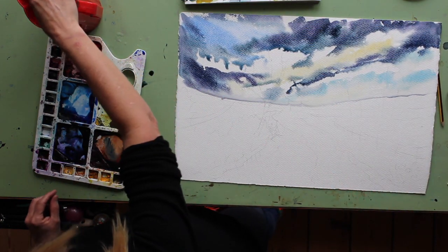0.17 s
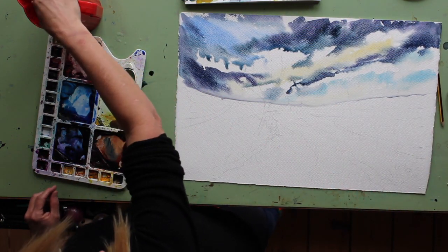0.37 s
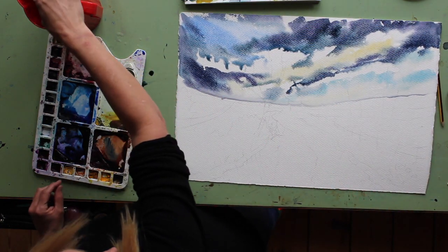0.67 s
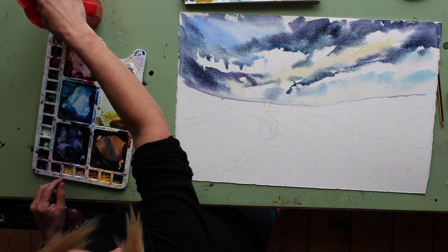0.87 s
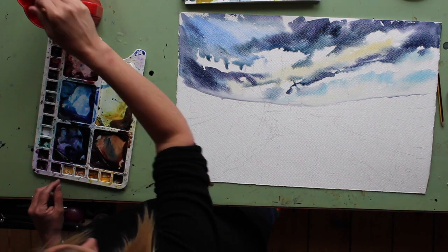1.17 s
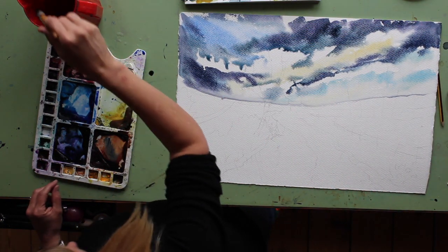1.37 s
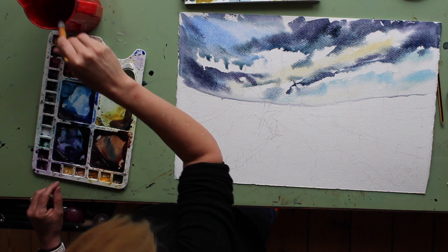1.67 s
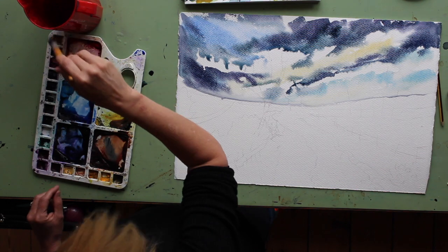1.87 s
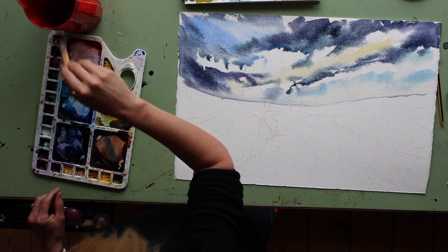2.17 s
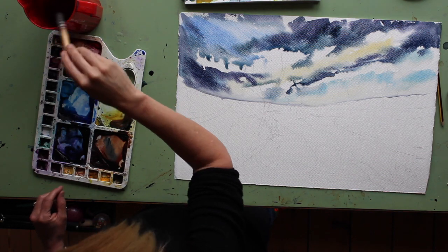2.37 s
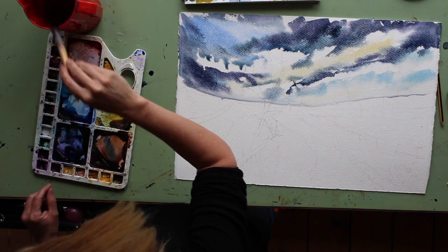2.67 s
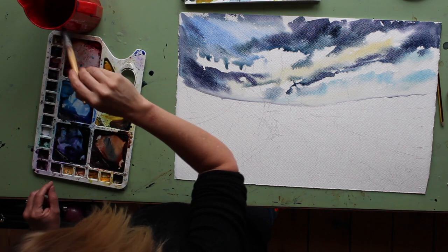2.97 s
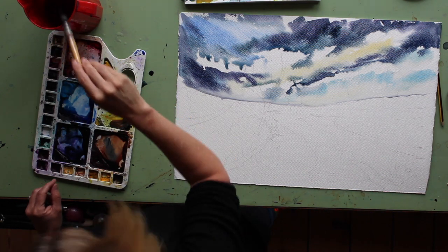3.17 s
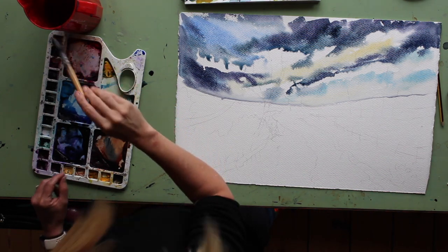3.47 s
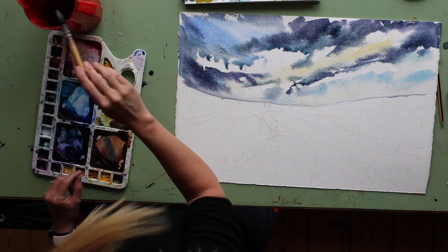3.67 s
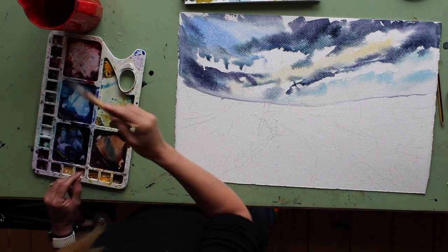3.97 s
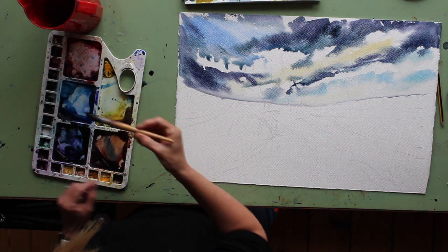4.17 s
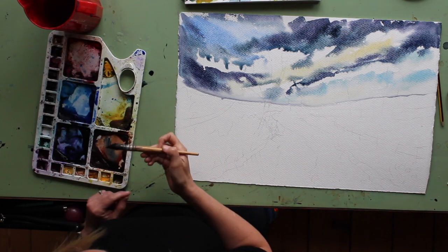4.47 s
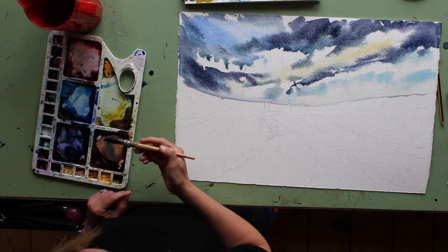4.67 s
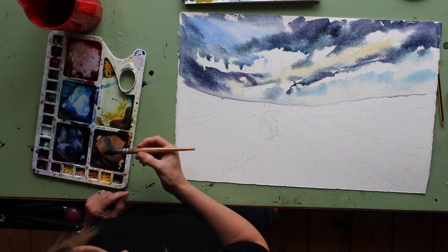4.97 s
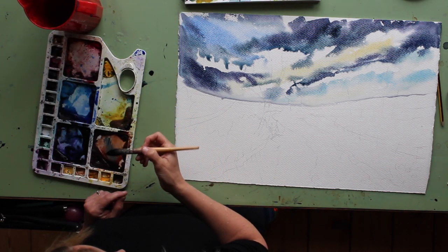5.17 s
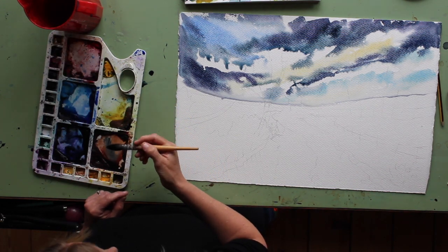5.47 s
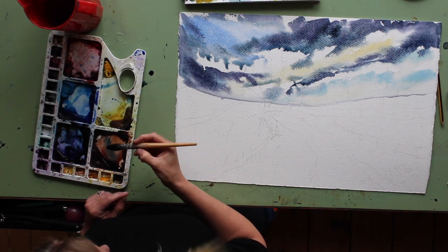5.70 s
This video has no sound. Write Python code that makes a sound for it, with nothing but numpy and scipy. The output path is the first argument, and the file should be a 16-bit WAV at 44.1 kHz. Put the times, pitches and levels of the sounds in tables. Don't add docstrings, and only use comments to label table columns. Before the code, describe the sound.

Bubbly brush rinsing in a small water pot, soft bristle wipes and taps, then dry scratchy palette strokes with tiny metal clinks.

```python
import sys
import numpy as np
from scipy import signal
from scipy.fft import rfft, irfft
from scipy.io import wavfile
from scipy.ndimage import uniform_filter1d

SR = 44100
rng = np.random.default_rng(int(sys.argv[2]) if len(sys.argv) > 2 else 0)


def gain_from_decibels(decibels):
    exponent = np.asarray(decibels, float) / 20
    return 10 ** exponent


def dump(signal):
    limited = np.clip(np.atleast_2d(signal).T, -1, 1)
    pcm = np.round(limited * 32767).astype(np.int16)
    wavfile.write(sys.argv[1], SR, pcm)


N = 257544


def evened(x):
    return x / np.sqrt(np.mean(x ** 2) + 1e-20)


def read(points, hz):
    f, value = np.transpose(points)
    return np.interp(np.log(hz + 1), np.log(f + 1), value)


def columns(rows):
    s, level_db, *rest = np.transpose(rows)
    t = np.arange(N) / SR
    return [np.interp(t, s, level_db, -120, -120)] + [np.interp(t, s, c) for c in rest]


def gestures(rows, fall_db_per_s):
    t = np.arange(0, N + 44, 44) / SR
    s, rise, hold, db = np.transpose(rows)[:, :, None]
    climb_db = 20 * np.maximum(s - t, 0) / rise
    fall_db = fall_db_per_s * np.maximum(t - s - hold, 0)
    gain = np.sqrt((gain_from_decibels(db - climb_db - fall_db) ** 2).sum(0))
    return np.interp(np.arange(N) / SR, t, gain)


def add(mix, s, sound):
    part = mix[round(s * SR):][:len(sound)]
    part += sound[:len(part)]


def coloured(x, points):
    return irfft(rfft(x) * gain_from_decibels(read(points, np.fft.rfftfreq(len(x), 1 / SR))), len(x))


def resonate(x, hz, width_hz):
    turn = np.exp(2j * np.pi * np.cumsum(hz * np.ones(len(x))) / SR)
    r = np.exp(-np.pi * width_hz / SR)
    return 2 * (turn * signal.lfilter([1 - r], [1, -r], x / turn + 1e-18)).real


def room(x):
    # (f/Hz, t60/s)
    room_t60 = [(200, 0.53), (1000, 0.44), (4000, 0.32), (14000, 0.34)]
    taps = np.zeros(SR)
    at = np.arange(200, SR - 20, 20) + rng.integers(0, 20, (SR - 201) // 20)
    taps[at] = rng.choice([-1., 1.], at.shape)
    hz, t, z = signal.stft(taps, SR, nperseg=256)
    fade = gain_from_decibels(-60 * t / read(room_t60, hz)[:, None])
    tail = signal.istft(z * fade, SR, nperseg=256)[1]
    return signal.fftconvolve(x, tail / np.linalg.norm(tail))[:N]


def room_tone():
    # (f/Hz, level/dB per Hz)
    air_colour = [(16, -50), (28, -3.5), (69, 3), (87, -13), (114, -16), (178, -11), (245, -18.5),
                  (704, -23.5), (782, -24), (1050, -22), (1820, -34.5), (3260, -30), (4970, -34.5),
                  (5830, -34.5), (15500, -38.5)]
    return gain_from_decibels(-57) * evened(coloured(rng.standard_normal(N), air_colour))


def steps():
    # (t/s, rise/s, hold/s, level/dB)
    footfalls = [(0.0, .01, 0.065, -47), (.32, 0.35, 0.073, -47), (.42, 0.089, 0.52, -55),
                 (.94, 0.017, 0.017, -43.5), (1.07, 0.089, 0.22, -54), (1.82, 0.99, 0.13, -61),
                 (2.76, 0.26, 0.066, -64.5), (3.18, 0.11, 0.015, -50), (3.29, .05, 0.027, -49),
                 (3.4, 0.13, 0.17, -57.5), (4.02, 0.12, 0.073, -53.5), (4.15, .1, 0.075, -54),
                 (4.65, 0.036, 0.0032, -48), (4.78, 0.058, 0.0069, -48.5), (5.45, 0.18, 0.044, -54)]
    # (t/s, rise/s, hold/s, level/dB)
    bumps = [
        (.19, 0.11, 0.017, -45.5),
        (.52, 0.18, 0.12, -48),
        (3.32, 0.068, 0.052, -51.5),
    ]
    # (t/s, rise/s, hold/s, level/dB)
    shuffle = [
        (3.31, 0.6, 0.27, -62),
        (4.01, 0.11, 0.17, -62),
        (5.46, 0.36, 0.0089, -63),
    ]
    # (t/s, rise/s, hold/s, level/dB)
    sleeve = [
        (4.45, 0.85, 0.2, -73),
    ]
    # (f/Hz, width/Hz)
    board_modes = [(74, 24), (108, 61.5), (195, 114)]
    noise = rng.standard_normal((5, N))
    boom, knock, creak = (evened(resonate(resonate(x, hz, width), hz, 0.92 * width))
                          for x, (hz, width) in zip(noise, board_modes))
    dull = evened(coloured(noise[3], [(200, -6), (300, 1.0), (900, -16.5), (1400, -13.5), (3000, -36)]))
    bright = evened(coloured(noise[4], [(700, -8.5), (1200, -7), (1800, -9.5), (2600, -14.5), (5000, -74)]))
    weight = gestures(footfalls, 180)
    boards = (weight + gain_from_decibels(-66.0)) * boom
    boards += (weight * gain_from_decibels(-3.0) + gestures(bumps, 114)) * knock
    boards += weight * gain_from_decibels(-14.0) * creak
    rub = gestures(shuffle, 134) * dull
    return boards + rub + (gain_from_decibels(-74.5) + gestures(sleeve, 40)) * bright


def ring(pitches, modes, low_db=0, top_db=0):
    t = np.arange(6000) / SR
    out = gain_from_decibels(-8 - 60 * t / .05) * np.diff(rng.standard_normal(len(t) + 1))
    for hz, (db, t60), (a, b, c) in zip(pitches, modes, rng.random((len(modes), 3))):
        db = db + low_db * (hz < 7500) + top_db * (hz > 14000)
        pair = np.sin(2 * np.pi * (hz * t + a))
        pair += .55 * np.sin(2 * np.pi * (hz * (.991 + .018 * b) * t + a))
        out += gain_from_decibels(db + 9 * (c - .55) - 60 * t / t60) * pair
    return out * (1 - np.exp(-t / 0.0018))


def charms():
    # (t/s, peak level/dB, low modes/dB, top modes/dB)
    clinks = [(1.5169, -34, -7, 0), (1.5238, -33.5, -8, -19), (1.5444, -65, -30, -12),
              (1.567, -44.5, -20, -1), (3.1933, -53, -3, -5), (3.218, -55, 2, -18), (3.226, -44, 0, -4),
              (5.035, -43, 2.5, -7), (5.068, -48, -18.5, -8), (5.1454, -46, -12, -7), (5.1706, -40, -9, -9),
              (5.212, -48, 3, 8), (5.2614, -45, -13, 3), (1.332, -51, -1, -8), (1.3447, -44, -1, -8),
              (5.005, -47, -13, 7)]
    charm_hz = [5200, 5870, 7170, 8700, 9390, 10130, 11545, 12920, 15110, 15300, 15420]
    # (level/dB, t60/s)
    charm_modes = [(-22, .06), (-19, .06), (-3, .04), (-13, .045), (-16, .04), (-10, .04), (-2, .042),
                   (-9, .045), (-9, .04), (-7, .04), (-6, .045)]
    # (t/s, peak level/dB)
    clasp_hits = [
        (4.838, -46),
        (4.863, -49.5),
        (4.901, -56),
    ]
    clasp_hz = [4330, 6120, 7350, 9360, 11500, 12400, 12900]
    # (level/dB, t60/s)
    clasp_modes = [(-9, .1), (0, .09), (2, .04), (-9, .06), (-4, .08), (-8, .03), (-3, .09)]
    # (t/s, rise/s, hold/s, level/dB)
    slides = [
        (5.045, 0.035, .02, -55),
        (5.23, 0.16, .01, -61),
    ]
    out = np.zeros(N)
    for s, db, low_db, top_db in clinks:
        add(out, s, gain_from_decibels(db - 3.5) * ring(charm_hz, charm_modes, low_db, top_db))
    for s, db in clasp_hits:
        add(out, s, gain_from_decibels(db - 8.5) * ring(clasp_hz, clasp_modes))
    contacts = rng.standard_normal(N) * (rng.random(N) < 250 / SR)
    rattle = evened(signal.oaconvolve(contacts, ring(charm_hz, charm_modes, -3, 2))[:N])
    return out + gestures(slides, 140) * rattle


def patchy(x, patchy_db):
    z = signal.stft(x, nperseg=256)[2]
    field = uniform_filter1d(rng.standard_normal(z.shape), 3, 0)
    field = evened(uniform_filter1d(field, 16, 1))
    return signal.istft(z * gain_from_decibels(patchy_db * field), nperseg=256)[1][:N]


def strokes():
    # (t/s, rise/s, hold/s, level/dB)
    wipes = [
        [(1.5, 0.24, 0.22, -67), (1.96, 0.77, 0.084, -65), (2.2, 0.055, .01, -68.5), (2.36, .09, 0.049, -63.5),
         (2.71, .045, 0.066, -64), (2.95, 0.12, 0.029, -74), (3.07, 0.065, 0.075, -66)],
        [(3.391, 0.0019, 0.0025, -46.5), (3.42, 0.018, 0.023, -55), (3.53, 0.14, 0.055, -48),
         (3.66, 0.055, 0.025, -63), (4.104, 0.0028, 0.0027, -56)],
        [(4.842, .003, 0.17, -59), (5.068, 0.07, 0.0072, -47), (5.13, 0.061, 0.11, -52),
         (5.24, 0.093, 0.041, -55.5)],
        [(5.518, 0.025, 0.087, -48.5)],
    ]
    lifts = [400, 232, 172, 149]
    # (f/Hz, level/dB per Hz)
    rim_light = [(1500, -25), (2100, -3), (2500, -14), (3000, -4), (3500, -6), (4100, -2), (4600, -6),
                 (5400, -7), (7000, -16), (12000, -30)]
    # (f/Hz, level/dB per Hz)
    rim_firm = [(240, -43), (400, -33), (552, -12), (605, 6), (761, -12), (1100, -3.5), (1740, -6),
                (3690, 0), (6220, -7.5), (9260, -10), (15600, -23)]
    # (f/Hz, level/dB per Hz)
    scrub_colour = [(590, -31), (1000, -14), (1820, -9), (3120, -5.5), (4940, -10), (6510, -8.5),
                    (7060, -1), (7920, -8), (10700, -2), (11700, -5.5), (15600, -7.5)]
    # (f/Hz, level/dB per Hz)
    dab_colour = [(590, -24), (1000, -9), (1440, -13), (2290, 1), (2850, -7), (3840, -6.5), (4670, -6),
                  (10200, -7.5), (11700, -7.5), (15600, -8.5)]
    # (f/Hz, width/Hz, level/dB)
    scrub_wells = [(3040, 180, -15), (4460, 140, 1.5), (5900, 130, 5), (8800, 110, 0), (9400, 140, -6)]
    # (f/Hz, width/Hz, level/dB)
    dab_wells = [(2200, 220, -8), (3200, 130, -2), (3900, 180, -5)]
    parts = []
    for rows, lift, colour in zip(wipes, lifts, (rim_light, rim_firm, scrub_colour, dab_colour)):
        slips = rng.standard_normal(N) * gain_from_decibels(2.3 * np.minimum(rng.exponential(1, N), 3.5))
        parts.append(gestures(rows, lift) * gain_from_decibels(-3.5) * evened(coloured(slips, colour)))
    wells = sum(gain_from_decibels(db) * resonate(parts[2], hz, width) for hz, width, db in scrub_wells)
    wells += sum(gain_from_decibels(db) * resonate(parts[3], hz, width) for hz, width, db in dab_wells)
    return patchy(sum(parts) + wells, patchy_db=2.0)


def ticks():
    # (t/s, peak level/dB, centre f/Hz)
    film_ticks = [(0.3147, -46, 5700), (0.3303, -35, 6060), (0.3678, -31.5, 8000), (0.378, -28, 5600),
                  (0.4486, -37, 5900), (0.7832, -40, 5900), (0.9782, -44, 7100), (1.066, -48, 7900),
                  (1.1248, -45, 5200), (1.141, -48, 5450), (1.2516, -48, 6900), (1.3307, -42, 10900),
                  (1.3844, -53, 11500), (1.699, -50, 8800), (1.8088, -50.5, 4900), (1.8214, -51, 9600),
                  (1.8542, -46, 7150), (1.8945, -50, 11000), (1.9145, -46, 12500), (2.3067, -50, 6000),
                  (2.5964, -55, 7400), (.314, -43, 3270), (.3298, -27, 2500), (1.1227, -37.5, 3140),
                  (5.5854, -40.5, 3900), (3.389, -33, 3900), (4.1035, -40, 2900), (.137, -23, 3800),
                  (.1435, -30, 2800), (.474, -37, 3200), (1.0745, -44, 1510), (1.907, -41, 2350),
                  (1.112, -39, 2250), (1.15, -43, 2200), (1.32, -42, 950), (1.09, -51, 3500),
                  (.015, -34, 2900), (.478, -36, 800), (1.165, -41, 900), (1.2, -52, 2300),
                  (1.345, -49.5, 1100), (.017, -30, 4500)]
    # (t/s, peak level/dB, centre f/Hz)
    sprays = [(0.0144, -46.5, 8810), (0.0598, -51, 11300), (0.1346, -40.5, 7390), (0.1604, -44, 11600),
              (0.2094, -47.5, 6900), (0.3745, -35.5, 7600), (0.4728, -45, 7400), (0.4923, -42, 11000),
              (0.5312, -46, 10200), (0.6044, -41, 6400), (0.6134, -45, 9420), (0.6943, -45.5, 8800),
              (0.8414, -53, 7450), (1.1504, -52, 7340), (1.3448, -38, 12000), (4.103, -50, 12000),
              (.7825, -55, 13000), (.978, -53, 12500)]
    # (t/s, peak level/dB, centre f/Hz)
    handle_taps = [(0.1357, -36, 3060), (0.4741, -30.5, 2450), (0.836, -38, 2500), (1.074, -46, 2000),
                   (1.9035, -44, 2120), (2.6698, -53, 3900), (3.3878, -33.5, 3460), (3.9779, -52, 2800),
                   (4.0972, -56, 3030), (4.1027, -35, 2530), (4.9581, -53, 3100)]
    # (t/s, peak level/dB, centre f/Hz)
    thuds = [
        (3.273, -46.5, 740),
        (3.308, -43, 370),
        (3.389, -46.5, 1600),
        (0.45, -35, 190),
        (5.2, -60, 810),
        (3.982, -53.5, 1000),
        (4.101, -50, 760),
        (3.531, -51, 330),
    ]
    # (t/s, peak
    # level/dB, centre f/Hz)
    pips = [(.0987, -58, 11800), (.1915, -48, 8870), (.3296, -40, 6660), (.3296, -52, 10300),
            (.3685, -32, 3000), (.5275, -44, 6850), (.5312, -38.5, 10100), (.596, -47, 9030),
            (.6885, -36.5, 4540), (.6943, -44, 9620), (.7821, -45, 5600), (.7821, -56, 12700),
            (.8295, -50, 11100), (.8305, -45, 4600), (.915, -55, 6900), (.9193, -55, 2270),
            (.973, -55, 5060), (.9772, -46, 11200), (.979, -43, 7500), (.982, -41, 6430),
            (1.0745, -36, 1310), (1.1084, -35, 2200), (1.118, -42, 2400), (1.1418, -53, 12300),
            (1.2341, -51, 1440), (1.3743, -50, 1100), (4.958, -57, 10000), (5.5092, -58, 3200),
            (5.5147, -59, 2070), (5.587, -41.5, 3900), (1.455, -51.5, 3600), (1.494, -52, 5900),
            (1.542, -51, 3700), (1.582, -51, 3000), (1.657, -60, 10400), (1.699, -59, 9200),
            (1.788, -57, 13000), (1.8542, -42.5, 7300), (1.896, -51, 9800), (1.904, -38, 2320),
            (1.9145, -44, 13800), (1.912, -45, 2550), (3.216, -53, 5840), (3.33, -58, 6540),
            (3.41, -43, 4860), (.382, -41, 6000), (1.126, -36, 5300), (1.152, -43, 1500),
            (4.9581, -46, 3300), (.8375, -50, 3790)]
    out = np.zeros(N)
    hz = np.fft.rfftfreq(2048, 1 / SR)
    t_ms = np.arange(2048) * 1000 / SR
    # spread in octaves, length in ms
    kinds = ((film_ticks, .3, 2.2), (sprays, .7, 6.0), (handle_taps, .9, 3.0), (thuds, .65, 16.0), (pips, .1, 2.5))
    for table, octaves, ms in kinds:
        shape = (1 - np.exp(-t_ms / (0.16 * ms))) * np.exp(-t_ms / ms)
        for (s, db, centre_hz), noise in zip(table, rng.standard_normal((50, 2048))):
            band = np.exp(-.5 * (np.log2(hz / centre_hz + 1e-9) / octaves) ** 2)
            add(out, s, gain_from_decibels(db - 3.5) * evened(irfft(rfft(noise) * band)) * shape)
    return out


def hums():
    # (t/s, length/s, level/dB, f/Hz)
    trapped_air = [(0.0, .11, -49, 571.5), (.0, 0.078, -52, 285.5), (.15, 0.048, -46, 687),
                   (0.204, 0.089, -41.5, 685.6), (0.406, 0.036, -43.5, 712), (0.489, 0.083, -50, 564),
                   (0.586, 0.076, -44, 694), (0.036, 0.046, -46.5, 4540), (0.067, 0.039, -55, 4170),
                   (0.135, 0.048, -46, 3146), (1.077, .05, -49, 1227), (1.112, 0.033, -50, 2010),
                   (1.145, 0.024, -51.5, 2450), (1.16, 0.033, -50.5, 860), (1.249, .06, -59, 686),
                   (1.321, 0.046, -62, 1987)]
    out = np.zeros(N)
    for (s, length, db, hz), noise in zip(trapped_air, rng.standard_normal((20, 8192))):
        width_hz = 0.042 * hz
        tone = evened(resonate(resonate(noise, hz, width_hz), hz, width_hz))[-round(length * SR):]
        ends = np.sin(np.pi * np.linspace(0, 1, len(tone)) ** 0.48) ** 0.75
        add(out, s, gain_from_decibels(db) * evened(tone) * ends)
    return out


def bubble(db, hz, ms, rise=0.025):
    u = np.arange(round(6 * ms * SR / 1000)) * 1000 / SR / ms
    shape = (1 - np.exp(-u / .18)) * np.exp(-np.maximum(u - .5, 0) * 1.7)
    return gain_from_decibels(db) * shape * np.sin(2 * np.pi * np.cumsum(hz * (1 + rise * (u - .5))) / SR)


def pops():
    # (t/s, peak level/dB, f/Hz)
    glugs = [(0.056, -37.5, 1410), (0.126, -21, 940), (0.1316, -33, 1035), (0.1436, -29.5, 1420),
             (0.2058, -28.5, 1477), (.3754, -29, 810), (.4059, -35, 720), (.4298, -39, 765),
             (0.477, -30.5, 906), (.4828, -28.5, 625), (.545, -34.5, 700), (.6287, -35, 677),
             (0.8406, -38.5, 1003), (0.994, -38.5, 1175), (1.072, -41, 1550), (1.151, -39, 1400),
             (1.1606, -43.5, 896), (1.2521, -43.5, 744), (1.3184, -41.5, 960), (3.275, -50, 890)]
    # (t/s, peak level/dB, f/Hz)
    small_bubbles = [(.008, -37.5, 5120), (0.017, -33, 4150), (.0163, -48, 2070), (.1367, -31, 2130),
                     (0.1391, -30, 3090), (0.1449, -30, 2345), (.157, -30, 2270), (.231, -32, 1930),
                     (.312, -43, 2310), (.3304, -31, 2250), (0.3788, -32, 5860), (.448, -39, 4050),
                     (0.4752, -40.5, 2770), (.507, -38, 3500), (.51, -35.5, 2105), (.5315, -37.5, 2120),
                     (0.538, -38.5, 2640), (0.604, -44, 4150), (0.6927, -32, 1925), (0.7826, -41.5, 5500),
                     (0.8366, -51.5, 3180), (0.948, -48.5, 3100), (.9806, -43.5, 2335), (1.0754, -48, 1880),
                     (1.1119, -39.5, 2200), (1.127, -48, 4120), (1.158, -49, 2260), (1.91, -44.5, 2450)]
    # (t/s, peak level/dB, f/Hz)
    droplets = [(0.03, -45, 2350), (0.044, -42, 2050), (0.135, -40, 4940), (0.205, -40, 3445),
                (0.211, -53, 5350), (0.312, -54.5, 5813), (0.312, -46, 3273), (0.378, -40.5, 4130),
                (0.387, -43, 6400), (0.491, -54, 6804), (0.605, -49, 6100), (0.654, -44, 3660),
                (0.683, -56, 3800), (0.693, -51, 3410), (0.698, -58, 5340), (0.775, -55, 3170),
                (0.834, -54, 3789), (0.839, -63, 6718), (0.925, -48.5, 2360), (0.971, -54, 4980),
                (0.98, -60, 4130), (0.988, -49, 1950), (1.047, -66, 5297), (1.073, -42.5, 1004),
                (1.254, -58, 3250), (1.323, -58, 2060), (1.327, -67, 5560), (1.342, -57, 6930),
                (1.354, -60, 4280), (1.422, -64, 6976)]
    out = np.zeros(N)
    for s, db, hz in glugs:
        add(out, s, bubble(db, hz, 4.86, rise=0.037))
    for s, db, hz in small_bubbles:
        hardness = gain_from_decibels(-0.44 * (db + 39))
        ms = 6.4 * hardness * (2300 / hz) ** 0.24
        add(out, s, bubble(db, hz, ms, rise=0.052))
    for s, db, hz in droplets:
        add(out, s, bubble(db + 2.5, hz, 5.7 * (2300 / hz) ** 0.24, rise=0.03))
    return out


def froth(low_hz, high_hz, per_s, cycles, spread_db):
    span = 2 * SR
    size = gain_from_decibels(spread_db * np.minimum(rng.exponential(1, span), 4))
    size = size * (rng.random(span) < per_s / SR)
    kind = rng.integers(0, 24, span)
    cloud = np.zeros(span)
    for k, hz in enumerate(np.geomspace(low_hz, high_hz, 24)):
        cloud += signal.oaconvolve(size * (kind == k), bubble(0, hz, 1000 * cycles / hz, 0.086))[:span]
    return np.pad(evened(cloud), (0, N - span))


def water():
    # (t/s, effort level/dB, breaking of the surface/dB)
    plunge = [
        (0.0, -45.5, 11.5),
        (.116, -46.5, -7.5),
        (.134, -37.5, 0),
        (.266, -43.5, -8.5),
        (.364, -48.5, 6.5),
    ]
    # (t/s, effort level/dB, breaking of the surface/dB)
    swirl = [
        (.376, -45.5, -1),
        (.6, -43, -0.7),
        (.862, -55, 0),
        (1.06, -61.5, 8),
        (1.13, -50, 2.5),
        (1.38, -58.5, -6),
        (1.55, -94, 16),
    ]
    # (t/s, rise/s, hold/s, level/dB)
    slosh = [
        (0.0, .01, 0.22, -52),
        (.46, 0.034, 0.17, -44),
        (.95, 0.085, 0.25, -60.5),
    ]
    # (f/Hz, width/Hz, level/dB)
    pot_modes = [(700, 17, 2), (900, 110, -13.5), (1200, 480, -7.5), (2010, 79, -0.5), (2450, 200, -10.5),
                 (3370, 490, -14), (4120, 870, -12)]
    level_db, break_db = columns(plunge + swirl)
    big = froth(523.5, 1350, 700, 5.0, 2.65)
    mid = gain_from_decibels(break_db - 2.5) * froth(1456, 4600, 3500, 7.6, 2.1)
    mix = big + mid
    rung = sum(gain_from_decibels(db) * resonate(mix[:2 * SR], hz, width) for hz, width, db in pot_modes)
    rung = np.pad(rung, (0, N - 2 * SR))
    fine = evened(coloured(froth(5460, 16000, 5000, 10.0, 2.4), [(4500, 15.0), (15000, -13)]))
    fizz = gain_from_decibels(0.87 * break_db - 20.0) * fine
    stirred = gain_from_decibels(level_db - 3) * (0.44 * mix + 1.57 * rung + fizz)
    return stirred + gestures(slosh, 118) * gain_from_decibels(-3.0) * froth(283.0, 480.5, 200, 5.8, 0.53)


def scene():
    wash, clicks, rubs, jingle, single = water(), ticks(), strokes(), charms(), pops()
    direct = wash + clicks + rubs + jingle + single
    sent = wash + rubs + gain_from_decibels(-4) * clicks + gain_from_decibels(1) * single
    echo = room(gain_from_decibels(-4) * sent + gain_from_decibels(-3.0) * jingle)
    return (direct + echo + steps() + room_tone() + hums())[None]


def roll_off(x):
    return signal.sosfilt(signal.butter(12, 16970, fs=SR, output="sos"), x)


def record(dry):
    # (f/Hz, level/dB)
    mic_colour = [(22, -16), (40, -1), (9000, -1), (10000, -0.5), (10500, -5), (11000, 0.5)]
    band_limit = signal.firwin(401, 15830, window=("kaiser", 9), fs=SR)
    heard = signal.oaconvolve(coloured(dry[0], mic_colour), band_limit, "same")
    return roll_off(heard[None])


dry = scene()
out = record(dry)
dump(out)
```